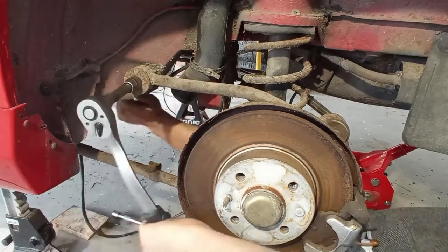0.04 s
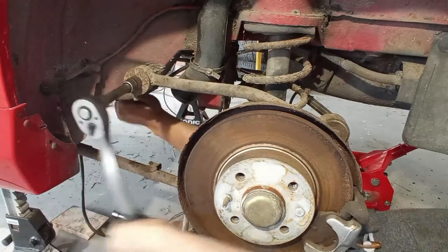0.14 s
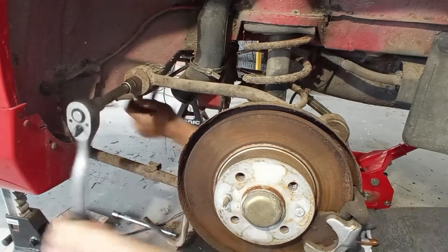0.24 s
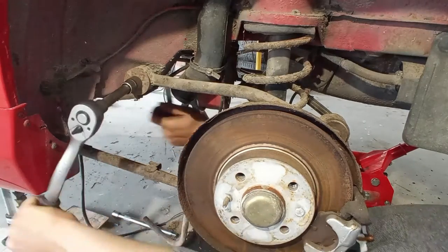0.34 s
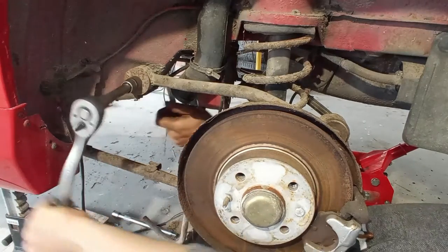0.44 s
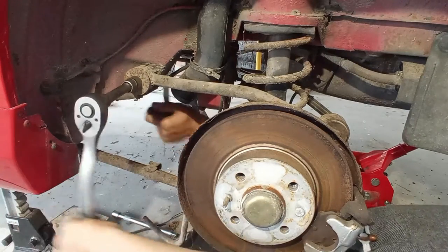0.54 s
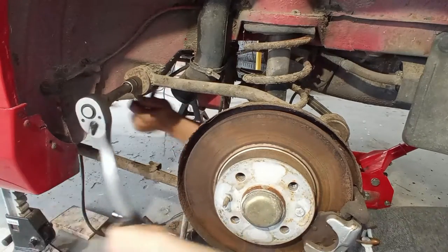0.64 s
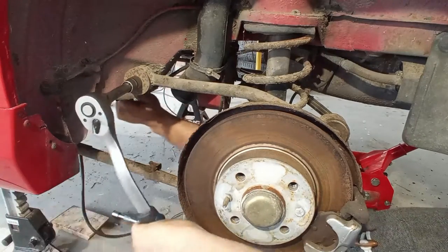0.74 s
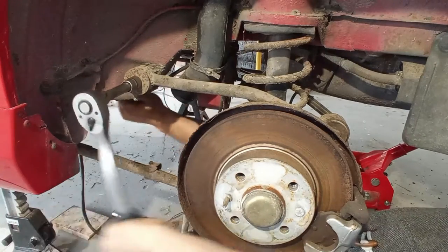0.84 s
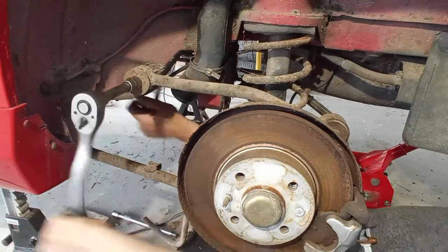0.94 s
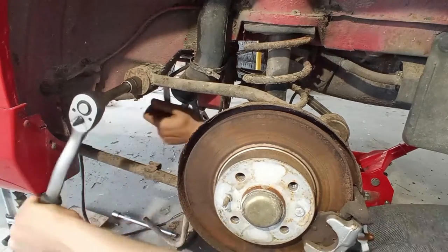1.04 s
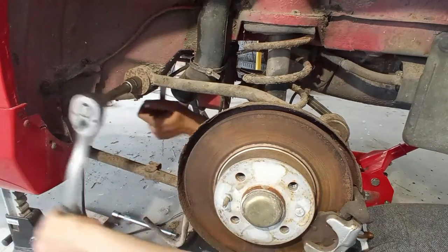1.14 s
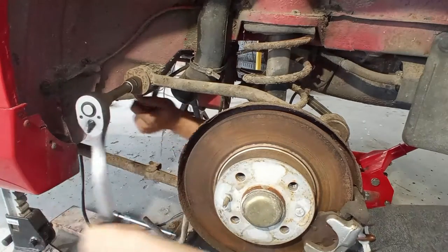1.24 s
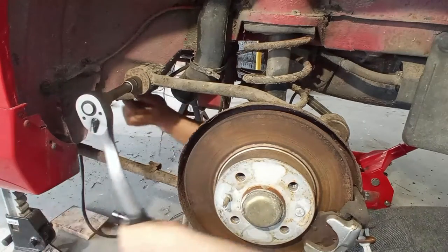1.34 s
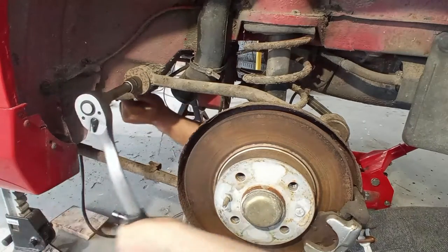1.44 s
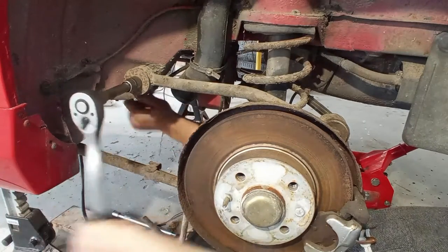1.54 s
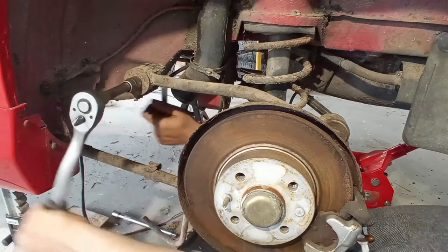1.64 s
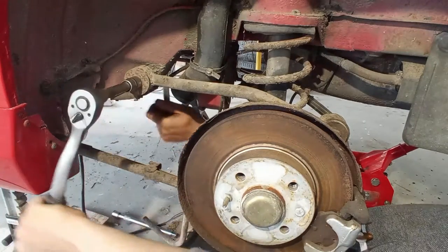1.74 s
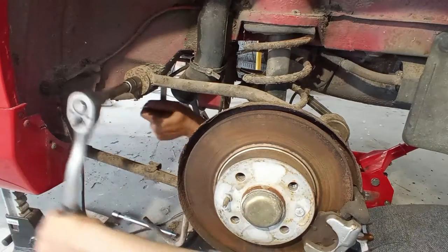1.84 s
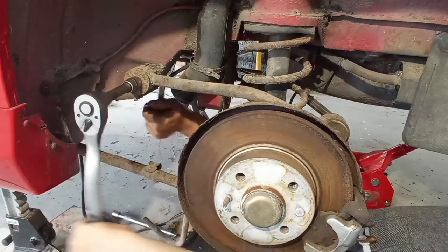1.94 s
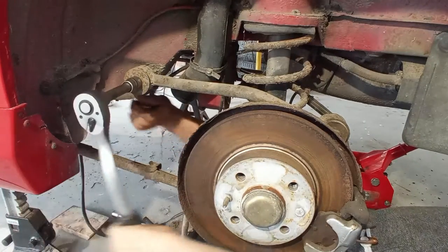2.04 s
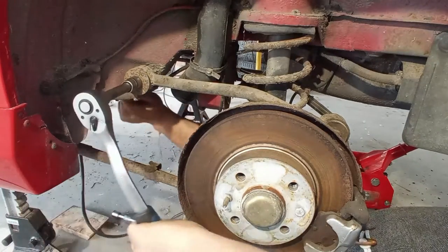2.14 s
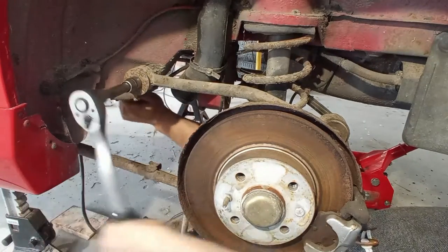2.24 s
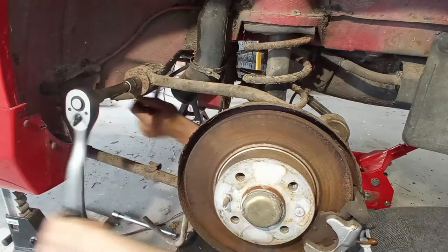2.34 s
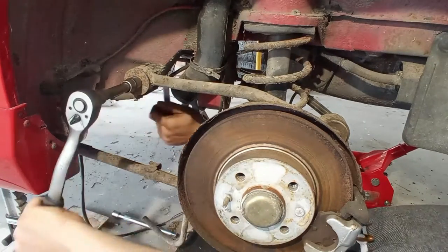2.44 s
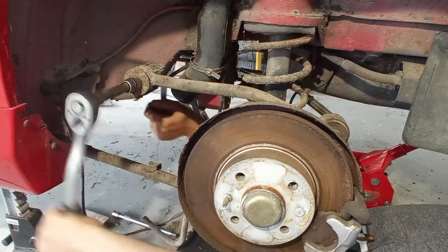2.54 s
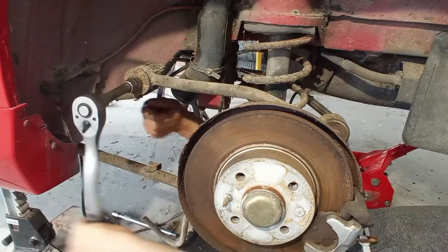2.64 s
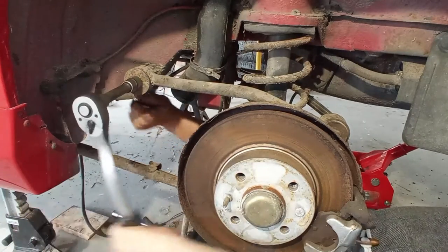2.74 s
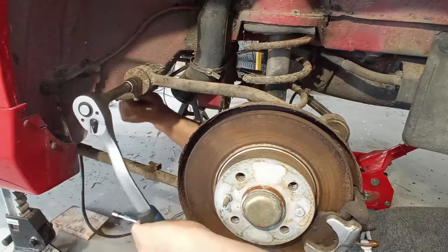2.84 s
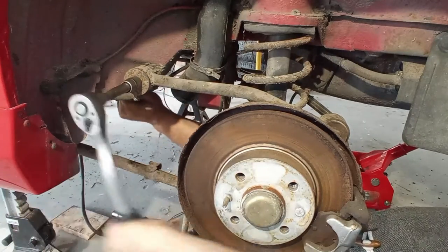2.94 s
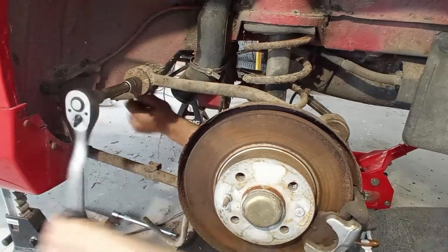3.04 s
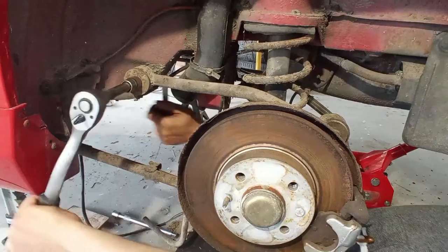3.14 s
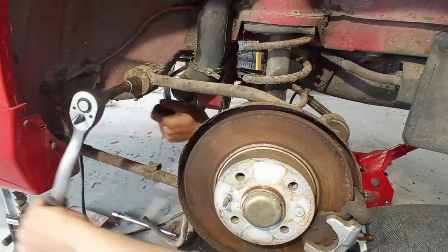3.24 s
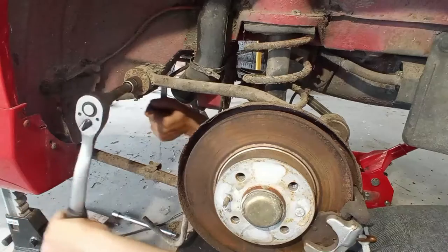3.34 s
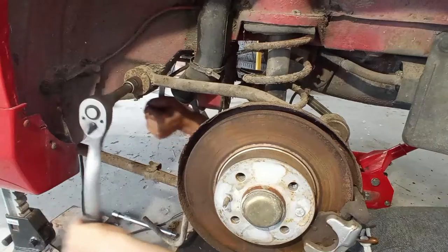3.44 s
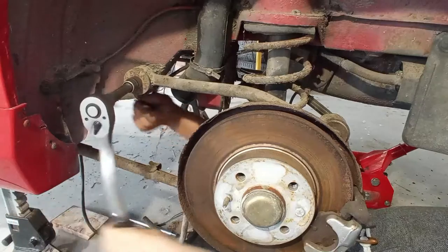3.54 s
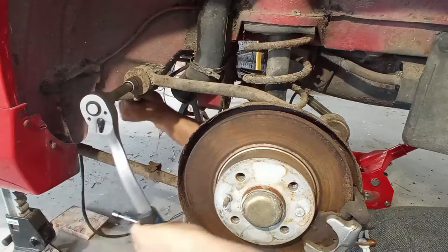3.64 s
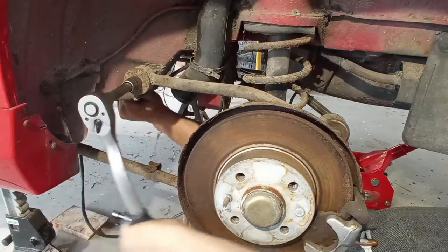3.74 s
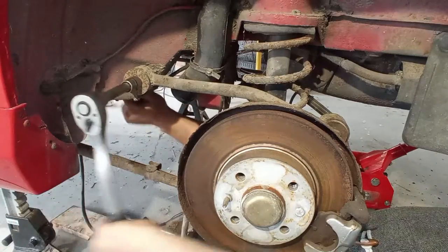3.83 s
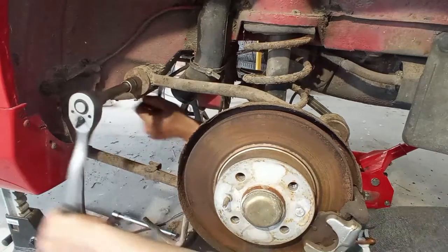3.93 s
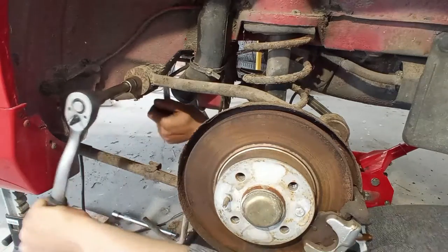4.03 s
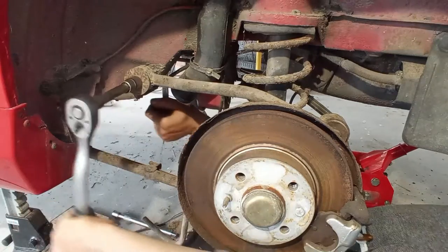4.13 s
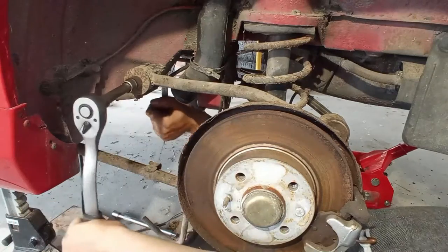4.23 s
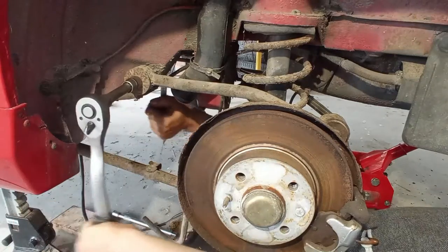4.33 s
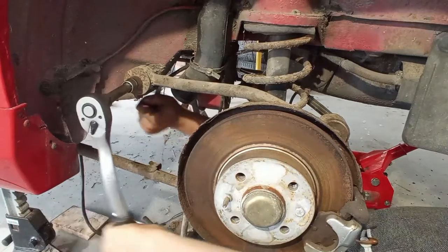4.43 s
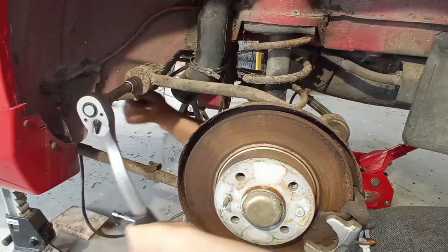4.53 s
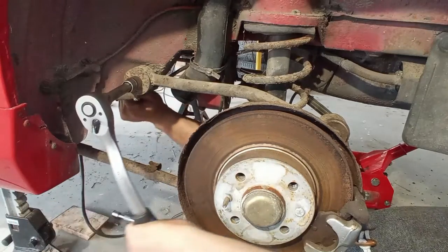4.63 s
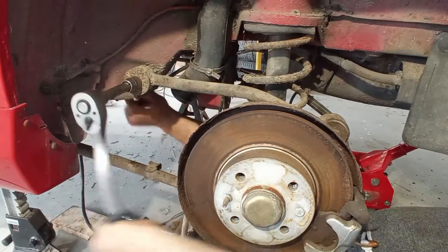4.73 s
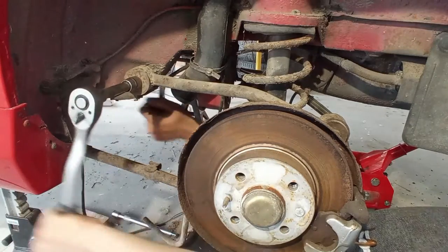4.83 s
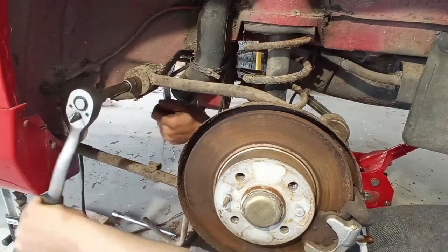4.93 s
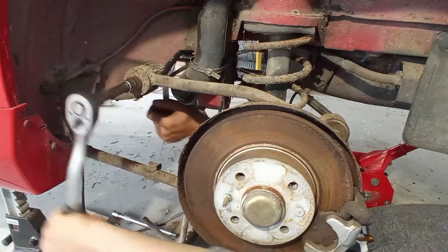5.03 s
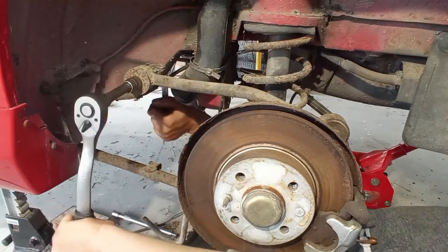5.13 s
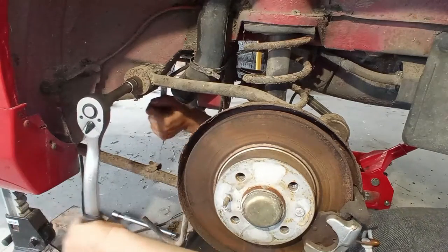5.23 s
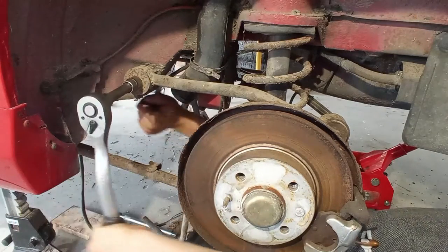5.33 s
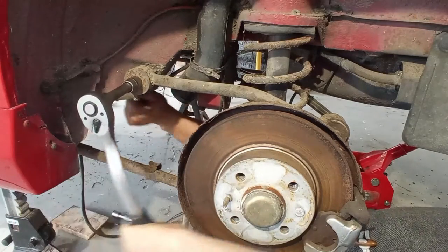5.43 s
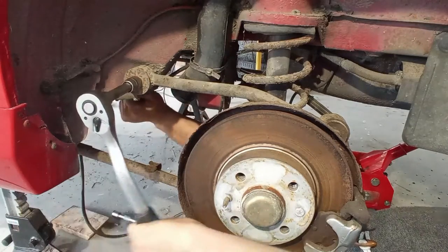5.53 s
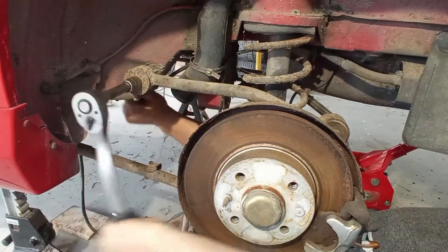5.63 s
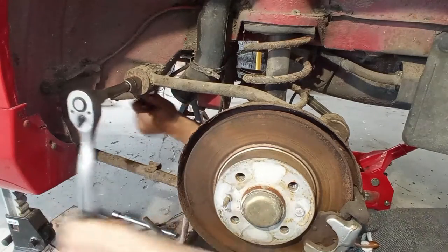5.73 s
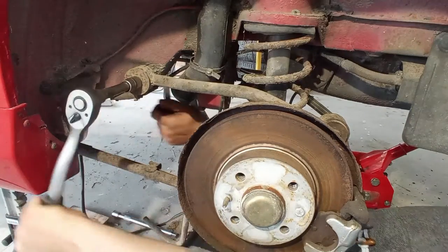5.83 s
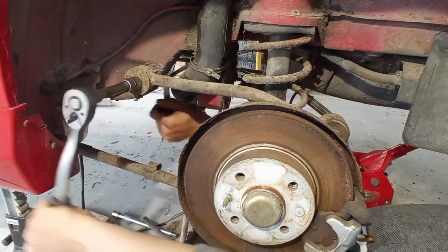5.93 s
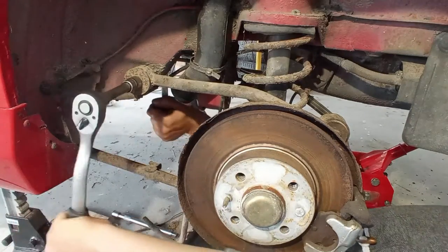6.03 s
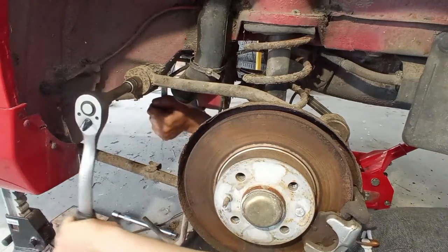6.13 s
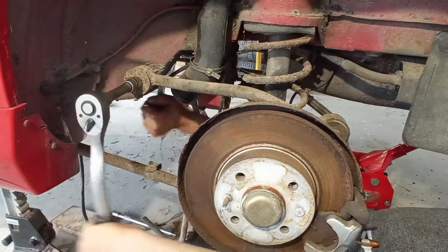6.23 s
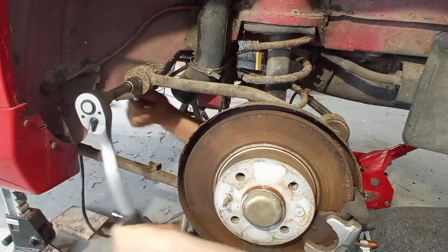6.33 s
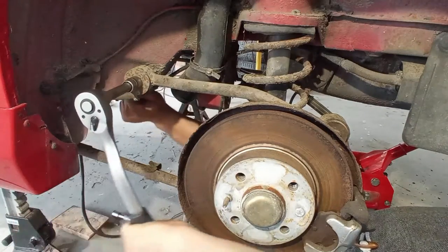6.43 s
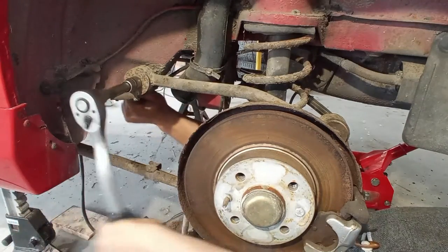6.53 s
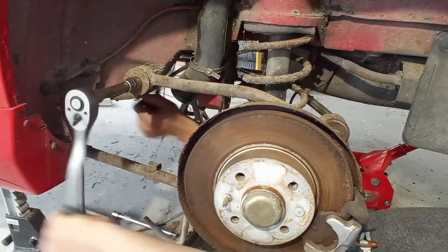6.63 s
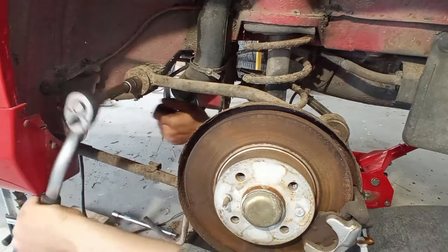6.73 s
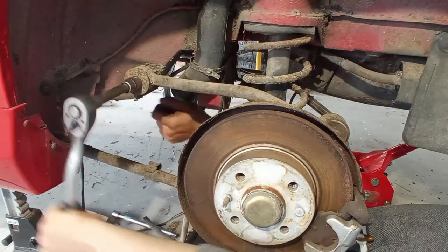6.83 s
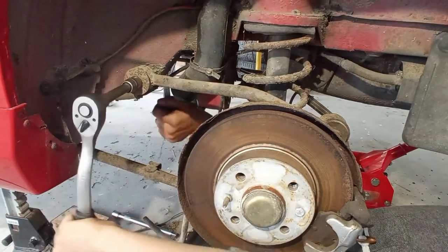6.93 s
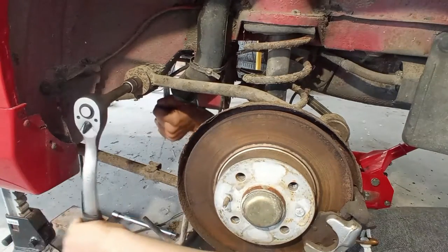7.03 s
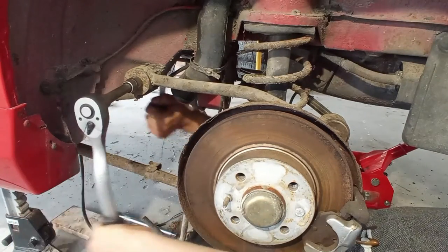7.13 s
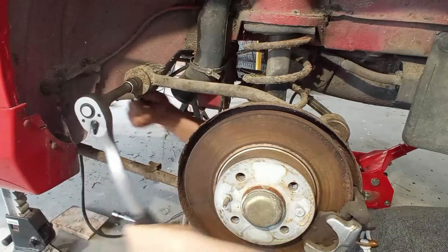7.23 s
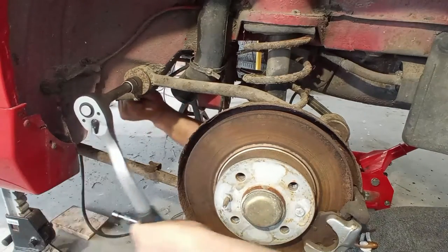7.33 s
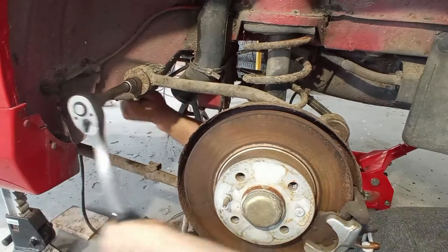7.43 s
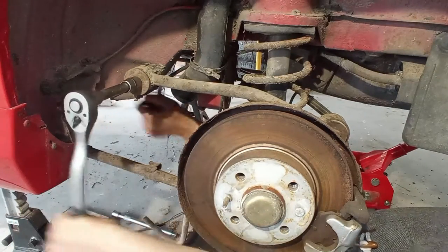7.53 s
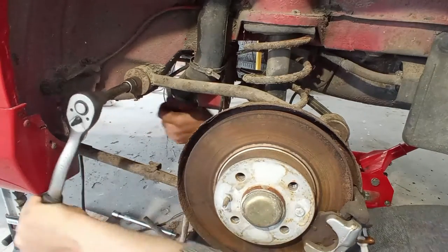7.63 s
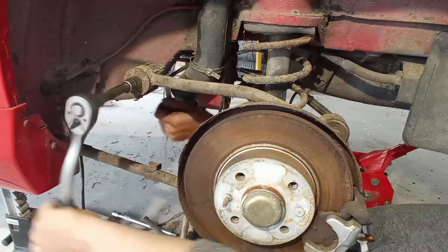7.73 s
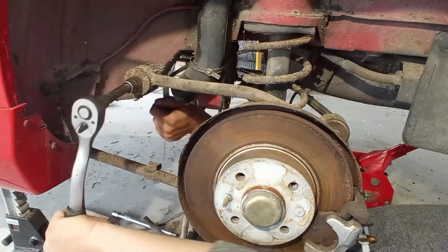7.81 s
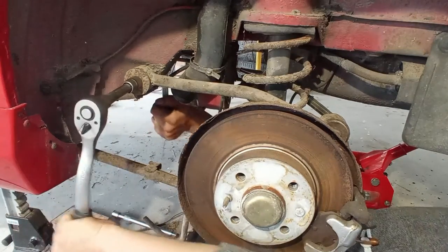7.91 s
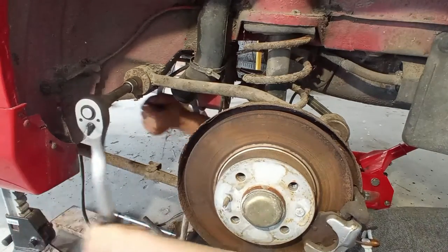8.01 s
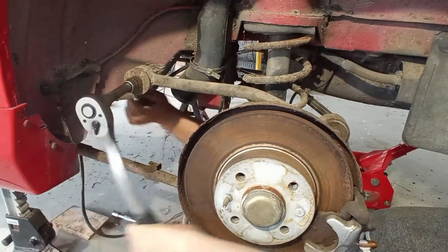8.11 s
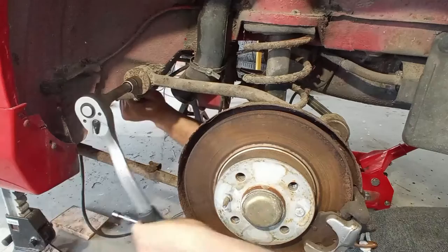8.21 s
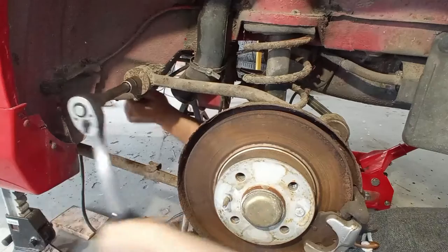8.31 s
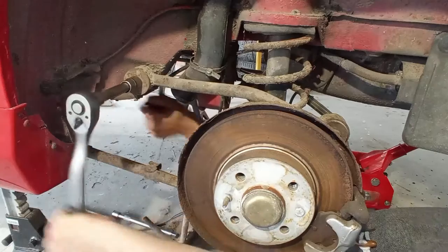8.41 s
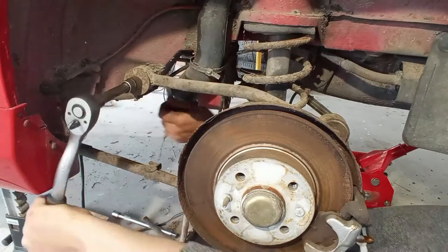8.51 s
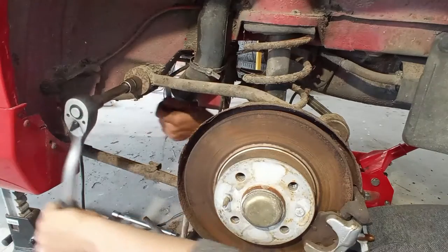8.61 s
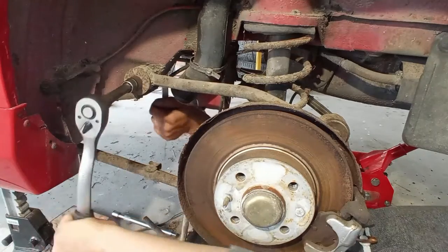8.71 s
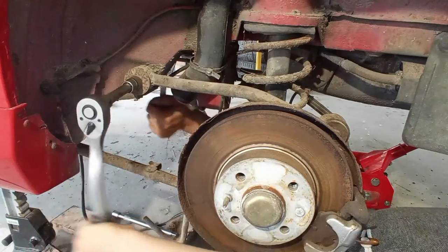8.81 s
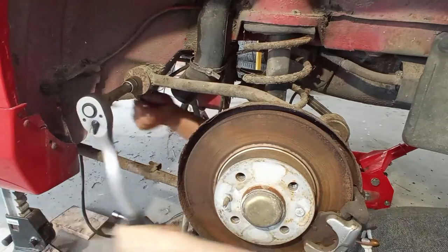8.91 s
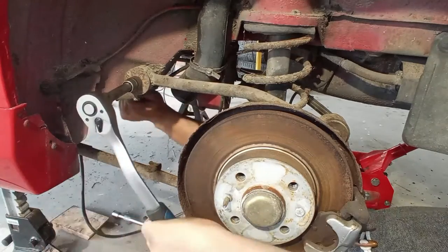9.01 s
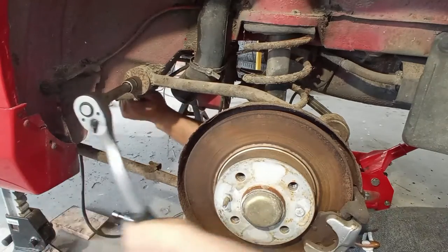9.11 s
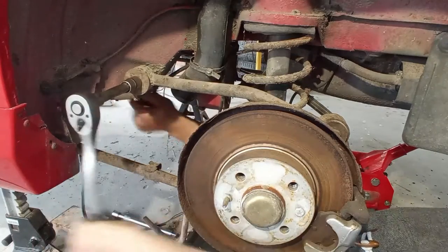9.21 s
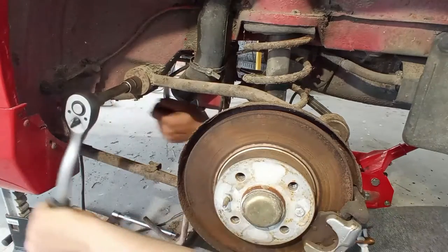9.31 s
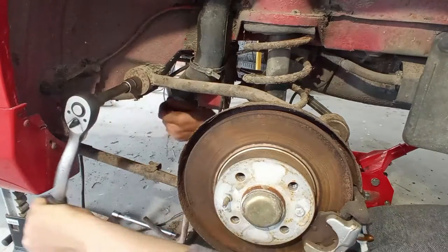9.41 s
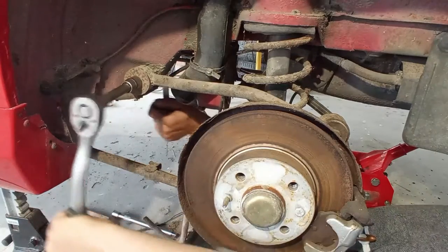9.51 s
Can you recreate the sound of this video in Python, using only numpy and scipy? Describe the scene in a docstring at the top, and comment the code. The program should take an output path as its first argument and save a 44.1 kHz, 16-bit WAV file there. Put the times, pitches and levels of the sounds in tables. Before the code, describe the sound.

Close to the microphone, a steel hand ratchet swings back and forth on a suspension bolt. Roughly every 0.8 seconds a fast run of about fifteen crisp, ringing clicks bursts out, then the socket rattles and the chassis knocks dully as the pull begins. Panels shudder, some pulls grind on rusty thread. Behind it, soft outdoor air, cooing doves, a far rooster and tiny chirps.

```python
"""Outdoor air hisses throughout; doves coo early, a far rooster crows and small birds chirp later.
Under a car a hand ratchet swings on a suspension bolt: twelve returns, each with some fifteen pawl clicks
(ringing steel modes plus noise bursts). About both ends of a swing the loose socket rattles and the chassis
takes dull knocks; its panels shake, the body rocks on a low tone, and some pulls grind the rusty thread."""
import sys
import numpy as np
from scipy import signal
from scipy.io import wavfile
from scipy.ndimage import uniform_filter1d

SR = 44100
rng = np.random.default_rng(int(sys.argv[2]) if len(sys.argv) > 2 else 0)


def amp(db):
    return 10 ** (np.asarray(db, float) / 20)


def write(x):
    x = np.atleast_2d(x).T
    wavfile.write(sys.argv[1], SR, np.round(np.clip(x, -1, 1) * 32767).astype(np.int16))


N = 421596

# modes of the steel head and handle: f/Hz, relative level/dB, t60/s
STEEL_MODES = [(2776, -8, 0.033), (3200, -11, 0.041), (3346.6, 5.5, 0.019), (3670, -5, 0.043),
               (4436, -11.5, .06), (4487, -8.5, .06), (5000, -10.5, 0.017), (5380, -2, 0.028),
               (5713, 0, .045), (6544, -6.5, .03), (7330, -17.5, .04), (9040, -4.5, 0.023),
               (9620, 1, 0.018), (10290, -6.5, .03), (13200, -11, .02), (14900, -4, .025)]


def evened(x):
    """Scales to rms 1."""
    return x / np.sqrt(np.mean(x ** 2) + 1e-20)


def read(points, hz):
    """Interpolates a table linearly over log frequency."""
    f, value = np.transpose(points)
    return np.interp(np.log(hz + 1), np.log(f + 1), value)


def curve(rows):
    """Level curve (t/s, level/dB) as gain, -120 dB outside its span."""
    s, db = np.transpose(rows)
    return amp(np.interp(np.arange(N) / SR, s, db, left=-120, right=-120))


def add(mix, s, sound):
    """Mixes a sound in at time s."""
    part = mix[round(s * SR):][:len(sound)]
    part += sound[:len(part)]


def placed(events, sounds):
    """Mixes each sound in at its event's time."""
    out = np.zeros(N)
    for row, sound in zip(events, sounds):
        add(out, row[0], sound)
    return out


def noise(spectrum, patchy_db):
    """Random short-time spectra with patches drifting over time and frequency, rms 1."""
    real, imag, patches = rng.standard_normal((N // 128 + 5, 257, 3)).T
    patches = uniform_filter1d(patches, size=3, axis=0)
    patches = evened(uniform_filter1d(patches, size=20, axis=1))
    level_db = read(spectrum, np.fft.rfftfreq(512, 1 / SR))[:, None] + patchy_db * patches
    z = (real + 1j * imag) * amp(level_db)
    return evened(signal.istft(z, nperseg=512, noverlap=384)[1][:N])


def whistle(size, hz, width_hz):
    """Noise through one narrow, steep-sided resonance (two equal poles), rms 1."""
    pole = [1, -np.exp(-np.pi * width_hz / SR)]
    blur = rng.standard_normal((size, 2)) @ [1, 1j]
    for _ in range(2):
        blur = signal.lfilter([1], pole, blur)
    return evened((blur * np.exp(2j * np.pi * hz * np.arange(size) / SR)).real)


def blows(events, modes, spread_db, rise_s, tilt_db_per_octave=0):
    """Each blow rings the same modes, each with its own share and phase; the grip shifts them a little."""
    hz, db, t60_s = np.transpose(modes)
    t = np.arange(4096) / SR
    share, phase, grip = np.moveaxis(rng.standard_normal((len(events), len(modes), 3, 1)), 2, 0)
    tilt_db = np.outer(tilt_db_per_octave, np.log2(hz / 300))
    level_db = (db + tilt_db)[..., None] + spread_db * share
    shifted_hz = hz[:, None] * (1 + .012 * grip)
    rings = np.sin(2 * np.pi * shifted_hz * t + 2 * phase) * amp(-60 * t / t60_s[:, None])
    sounds = (amp(level_db) * rings).sum(1) * (1 - np.exp(-t / rise_s))
    onset_rms = np.sqrt(np.mean(sounds[:, :300] ** 2, 1, keepdims=True))
    return amp(np.transpose(events)[1])[:, None] * sounds / onset_rms


def crackle(events, spectrum, low_t60_s, high_t60_s, tick_db):
    """Modes too dense to count: a noise burst a blow, with a sharp tick, the treble dying sooner."""
    train, t = np.zeros(N), np.arange(3000) / SR
    for s, db in events:
        add(train, s, amp(np.array([2 * db])))  # power
    hiss = noise(spectrum, 2.5)
    hiss = hiss / np.sqrt(uniform_filter1d(hiss ** 2, size=100))  # even strength from blow to blow
    low = signal.sosfilt(signal.butter(2, 7500, fs=SR, output="sos"), hiss)
    high = hiss - low
    rise = (1 - np.exp(-t / 0.00047)) ** 2
    tick = amp(2 * tick_db - 120 * t / .01)
    low_power = amp(-120 * t / low_t60_s) + .6 * tick
    high_power = amp(-120 * t / high_t60_s) + tick
    low_gain, high_gain = [np.sqrt(abs(signal.oaconvolve(train, rise * power)[:N]))
                           for power in (low_power, high_power)]
    return low * low_gain + high * high_gain


def teeth():
    """Evenly spaced teeth under a pendulum swing: clicks crowd and grow where the handle is fastest."""
    # return strokes: first tooth t/s, last tooth t/s, teeth, swing phase/rad at first, at last
    strokes = [(.2669, .464, 19, -.836, 1.355), (.9681, 1.123, 15, -.598, 1.094),
               (1.6451, 1.7694, 13, -.674, 1.113), (2.3629, 2.5179, 14, -.57, 1.282),
               (3.0868, 3.2465, 15, -.796, 1.262), (3.9351, 4.0734, 13, -.557, 1.179),
               (4.8426, 5.0063, 14, -.066, 1.36), (5.772, 5.9086, 14, -.433, 1.103),
               (6.6626, 6.8287, 14, -.654, 1.492), (7.5631, 7.7274, 16, -.492, 1.22),
               (8.4279, 8.5945, 15, -.301, 1.232), (9.2819, 9.4589, 16, -.74, 1.396)]
    # one sharp slack click before a stroke: t/s, relative level/dB
    lone_click = (5.731, -11)
    rest_db, speed_db, spread_db = -12.5, 1.3, 1.0  # relative: at rest, gained at full speed, tooth to tooth
    click_delay_s = .0005  # every stroke click sounds this much after its listed time
    rows = [lone_click]
    for first, last, count, begin, end in strokes:
        phase = np.arcsin(np.linspace(np.sin(begin), np.sin(end), count))
        db = rest_db + speed_db * np.cos(phase) + spread_db * rng.standard_normal(count)
        s = click_delay_s + first + (last - first) * (phase - begin) / (end - begin)
        rows += zip(s, db)
    return rows


def pawl():
    """Each click rings the steel and snaps with a noise burst."""
    # snap spectrum: f/Hz, relative density/dB
    snap = [(410, -36.5), (700, -19), (2040, -8), (2420, -9), (3290, -6.5), (4020, 0.5), (5610, -1),
            (7940, -8), (9570, 1), (11800, -12), (15300, -5.5), (16300, -36.5), (17000, -65)]
    clicks = teeth()
    ring = placed(clicks, blows(clicks, STEEL_MODES, spread_db=5.2, rise_s=0.00069))
    burst = crackle(clicks, snap, low_t60_s=0.046, high_t60_s=0.037, tick_db=4.8)
    return amp(-9.5) * ring + amp(-4.6) * burst


def socket_rattle():
    """Socket and extension take up their slack, ringing the same steel with a duller burst."""
    # slack blows: t/s, relative level/dB
    slack = [(0.183, -50), (0.2246, -43.5), (0.2377, -27.5), (0.246, -39.5), (0.5191, -27), (0.5375, -33.5),
             (0.5436, -31.5), (0.8904, -31.5), (0.9195, -29.5), (0.9382, -25), (1.2172, -31), (1.2243, -34),
             (1.6044, -34.5), (1.6107, -25), (1.6308, -39.5), (1.885, -35.5), (2.2944, -42.5),
             (2.3127, -32.5), (2.3306, -34), (2.3462, -33.5), (2.6139, -35.5), (3.014, -43), (3.0484, -28),
             (3.0731, -31), (3.2987, -36), (3.8781, -36), (3.9036, -36.5), (4.7948, -27.5), (4.833, -39),
             (5.0915, -37.5), (5.7269, -28.5), (6.0129, -36), (6.585, -39.5), (6.5979, -36), (6.6113, -31),
             (6.8729, -30.5), (6.902, -33.5), (6.9068, -23), (7.488, -50), (7.5075, -36.5), (7.5141, -27.5),
             (7.5493, -37.5), (7.8132, -28), (7.8328, -32.5), (8.3802, -32.5), (8.415, -38), (8.6954, -34),
             (8.72, -36), (9.2347, -29.5), (9.2424, -20.5), ]
    # rattle spectrum: f/Hz, relative density/dB
    rattle = [(410, -32.5), (700, 1.5), (1420, -9), (1620, 0), (3200, -8.5), (6410, -8), (15100, -36.5),
              (17000, -44)]
    ring = placed(slack, blows(slack, STEEL_MODES, spread_db=6., rise_s=0.00044))
    burst = crackle(slack, rattle, low_t60_s=0.052, high_t60_s=.03, tick_db=2.4)
    return amp(-13.5) * ring + amp(1.0) * burst


def wheel_well(x):
    """Reverberation: sparse taps of random sign, each band dying at its own speed."""
    # decay: f/Hz, t60/s
    decay = [(500, .25), (2000, .3), (5000, 0.31), (12000, .2)]
    taps = np.zeros(SR // 2)
    at = np.arange(150, SR // 2 - 20, 20)
    taps[at + rng.integers(0, 20, len(at))] = rng.choice([-1., 1.], len(at))
    hz, t, z = signal.stft(taps, SR, nperseg=256)
    tail = signal.istft(z * amp(-60 * t / read(decay, hz)[:, None]), SR, nperseg=256)[1]
    return signal.oaconvolve(x, tail / np.linalg.norm(tail))[:N]


def knocks():
    """Each knock is a first contact and a scatter of rebounds while the parts settle."""
    # knocks into the chassis: t/s, relative level/dB, brightness/(1.8 dB per octave of tilt about 300 Hz),
    # settling t60/s
    hits = [(0.239, -24.5, -4.5, 0.15), (0.435, -2, 0, 0.27), (0.545, -16, -1.5, 0.18),
            (0.938, -25, -6.5, 0.16), (1.213, -20.5, -0.5, 0.47), (1.612, -27.5, -17.5, 0.2),
            (1.891, -24, 0.5, 0.28), (2.332, -21.5, -4, 0.38), (2.615, -21, 3, 0.26),
            (3.017, -29.5, -11, 0.26), (3.046, -22, -5.5, 0.2), (3.22, -27, 0, 0.15), (3.355, -27, 3, 0.26),
            (3.88, -21, -6.5, 0.43), (4.18, -30, -3, 0.3), (4.804, -26, -3, 0.36), (5.027, -22, 6.5, 0.24),
            (5.114, -25.5, -10, 0.6), (5.733, -20, 2.5, 0.42), (5.929, -28, 5, 0.52),
            (6.032, -24, -10, 0.3), (6.102, -32, -41, 0.39), (6.613, -17, -4.5, 0.38),
            (6.797, -15, -15, 0.44), (6.906, -20.5, -1.5, 0.39), (7.511, -22.5, -9.5, 0.14),
            (7.551, -27, -5, 0.17), (7.73, -22.5, -7, 0.29), (7.823, -17.5, 0, 0.48),
            (8.378, -20, 3.5, 0.27), (8.53, -26, 4, 0.2), (8.704, -21, -1.5, 0.34), (9.238, -25, -2, 0.31)]
    # modes of body panels and suspension arms: f/Hz, relative level/dB, t60/s
    modes = [(135, -15, 0.096), (221.4, -3, .08), (303, -4.5, 0.057), (478, -0.5, 0.026), (641, 1, 0.048),
             (780, -15, .05), (1000, -9.5, .04), (1450, -19, .04)]
    _, _, bright_db, settle_s = np.transpose(hits)
    t = np.arange(8000) / SR
    where, size = np.moveaxis(rng.random((len(hits), len(t), 2)), 2, 0)
    chosen = where < 500 / SR  # about 500 rebounds a second
    rebounds = .45 * chosen * (2 * size - 1) * amp(-60 * t / np.clip(settle_s, .02, 1)[:, None])
    rebounds[:, 0] = 1  # first contact
    rings = blows(hits, modes, spread_db=0.5, rise_s=0.00095, tilt_db_per_octave=1.8 * bright_db)
    return amp(-7) * placed(hits, signal.fftconvolve(rings, rebounds, axes=1))


def shaken_panels():
    """Each push sets the panels going, sagging until the pull, which jolts them anew and dies away."""
    # swings: push t/s, push level/dB, pull t/s, pull level/dB, decay after the pull/(dB/s)
    swings = [(-.2, -46, -.03, -44, 110), (.23, -33, .43, -22, 95), (.9, -38, 1.21, -29, 150),
              (1.6, -33, 1.88, -37, 115), (2.3, -33, 2.61, -34, 106), (3.01, -35, 3.35, -35, 80),
              (3.87, -34, 4.05, -33, 80), (4.8, -34.5, 5.1, -35, 62), (5.72, -33, 6.02, -38, 75),
              (6.6, -33, 6.9, -30, 115), (7.5, -33, 7.81, -31, 80), (8.37, -33, 8.7, -29, 170),
              (9.23, -35, 9.6, -40, 100)]
    # panel spectrum: f/Hz, relative density/dB
    panels = [(53, -35), (90, -10.5), (122, 0), (157, -3.5), (540, -4), (779, -8), (1720, -16.5),
              (2890, -29.5), (5560, -30.5), (7860, -51.5), (9000, -37.5), (11700, -64), (19800, -120)]
    rise_s, sag_db_per_s, still_db = .03, 22, -68
    lean_db, lean_db_per_s = -17, 180  # the hand leans in before each push
    t, power = np.arange(N) / SR, amp(2 * still_db)
    for push, push_db, pull, pull_db, dying_db_per_s in swings:
        after_db = dying_db_per_s * np.maximum(t - pull, 0)
        lean = amp(lean_db - lean_db_per_s * np.maximum(push - t, 0))
        start = np.clip((t - push) / rise_s, lean, 1)
        sag_db = sag_db_per_s * np.maximum(t - push, 0)
        power = power + start ** 2 * amp(2 * (push_db - sag_db - after_db))
        jolt = np.clip((t - pull) / rise_s, 0, 1)
        power = power + jolt ** 2 * amp(2 * (pull_db - after_db))
    return np.sqrt(power) * noise(panels, patchy_db=4.)


def rocking():
    """The body rocks on its jack: a low wavering tone swells to each rock and sinks again."""
    # rocks after pushes and pulls: t/s, level/dB
    rocks = [(0, -39), (.57, -45), (.69, -48), (.97, -46), (1.16, -51), (1.31, -43), (1.5, -53),
             (1.64, -48), (1.96, -46), (2.37, -55), (2.72, -42), (3.06, -52), (3.45, -44), (3.63, -52),
             (3.95, -48), (4.12, -52), (4.33, -53), (5.23, -45), (5.43, -53), (5.78, -47), (6.11, -42),
             (6.36, -53), (6.5, -50), (6.65, -47), (6.87, -40), (7.05, -45), (7.35, -49), (7.54, -50),
             (7.79, -40), (7.95, -50), (8.45, -49), (8.78, -53), (9.29, -46), (9.5, -53)]
    rise_db_per_s, fall_db_per_s = 170, 120
    t = np.arange(N) / SR
    swell = sum(amp(db + np.minimum(rise_db_per_s * (t - s), fall_db_per_s * (s - t))) for s, db in rocks)
    hz = 54 + 12.0 * evened(uniform_filter1d(rng.standard_normal(N), size=4000))
    return swell * np.sqrt(2) * np.sin(2 * np.pi * np.cumsum(hz) / SR)


def grinding():
    """The rusty thread grinds under the pull: noise through the resonances of bolt and link."""
    # pulls: t/s, length/s, level/dB, change over the length/dB
    grind = [(1.24, .31, -57.5, -6.5), (4.05, .25, -46, -14), (5.1, .58, -40, -24), (7.86, .5, -41, -21)]
    # resonances of bolt and link: f/Hz, pole width/Hz, relative level/dB
    link = [(620, 66, -7.5), (758, 130, 4), (987, 60, -3), (1327, 55, -3.5), (1540, 39, -8.5),
            (1950, 28, -15.5), (2170, 90, -12.5), (3900, 250, -16), (5600, 970, -12)]
    ring = evened(sum(amp(db) * whistle(N, hz, width_hz) for hz, width_hz, db in link))
    pull = sum(curve([(s, db), (s + length, db + change_db)]) for s, length, db, change_db in grind)
    return uniform_filter1d(pull, size=900) * ring


def chassis():
    """Knocks, shaken panels, the rocking body and the grinding thread."""
    return knocks() + shaken_panels() + rocking() + grinding()


def call(rows):
    """Near-sine voice, with a third partial where one is listed; distance makes it waver."""
    s, hz, *levels_db = np.transpose(rows)
    t = np.arange(s[0], s[-1], 1 / SR)
    turn = 2 * np.pi * np.cumsum(np.interp(t, s, hz)) / SR
    waver = 1 + 0.32 * evened(uniform_filter1d(rng.standard_normal(len(t)), size=600))
    tone = sum(amp(np.interp(t, s, db)) * np.sin((2 * k + 1) * turn) for k, db in enumerate(levels_db))
    return s[0], np.sqrt(2) * tone * waver * signal.windows.tukey(len(t), .15)


def birds():
    """Doves and a rooster as gliding tones; chirps and a twitter as narrow noise, blurred by distance."""
    # one table a coo: t/s, f/Hz, level/dB
    doves = [
        [(0, 528, -56.5), (.2, 505, -44.5), (.25, 505, -46)],
        [(.68, 504, -46), (.81, 523.5, -55), (.95, 511, -47)],
        [(1.3, 500.3, -57), (1.38, 506, -50.5), (1.49, 480, -66)],
        [(2.68, 499.4, -49), (2.72, 517, -41.5), (2.83, 504.4, -43), (2.9, 496, -53), (3.04, 484, -46)],
        [(3.36, 499.5, -46), (3.56, 491, -54)],
    ]
    # one table a crow: t/s, f/Hz, level/dB, third partial level/dB
    rooster = [
        [(3.5, 588.0, -64, -95), (3.53, 583.1, -49.5, -77), (3.83, 605.4, -67, -94)],
        [(6.2, 512.7, -84, -58), (6.298, 612.7, -50, -59), (6.56, 601.5, -67, -80)],
        [(7.03, 620, -58, -59), (7.12, 620, -60, -69), (7.2, 603, -91, -72)],
    ]
    # small birds: t/s, length/s, f/Hz, pole width/Hz, level before fading/dB
    chirps = [(4.356, 0.14, 4150, 120, -69), (4.365, .09, 3650, 149, -63), (4.384, 0.11, 2884, 60, -71),
              (4.46, .08, 3830, 151, -63), (4.55, .06, 3660, 120, -65), (4.56, .06, 3040, 200, -69.5),
              (4.64, .11, 3950, 200, -65.5), (4.646, 0.062, 3300, 250, -68), (6.1, 0.24, 4194, 1205, -59.5),
              (6.363, 0.19, 3440, 200, -71), (8.17, .07, 6700, 101.5, -73.5), (8.27, .11, 5750, 79.5, -65),
              (8.9, .14, 6900, 79.4, -74), (9.0, .2, 5000, 80, -67.5)]
    out = np.zeros(N)
    for rows in doves + rooster:
        add(out, *call(rows))
    for s, length, hz, width_hz, db in chirps:
        t = np.arange(0, length, 1 / SR)
        fade = np.minimum(t / 0.00796, 1) * (1 - t / length) ** .7
        add(out, s, amp(db) * whistle(SR // 2, hz, width_hz)[:len(t)] * fade)
    return out


def air():
    """Outdoor hiss with hollow tones (narrow noise), each swelling and fading."""
    # hiss spectrum: f/Hz, relative density/dB
    hiss = [(53, -28), (90, 3.5), (163, -11.5), (1100, -23.5), (1560, -17), (1900, -15.5), (8240, -35),
            (15200, -44.5), (17000, -54.5)]
    # hiss swell: t/s, level/dB
    hiss_swell = [(0, -65.5), (2.2, -67), (2.9, -62.5), (4.6, -62), (5.6, -63.5), (6.5, -64.5), (7.3, -67),
                  (9.6, -68)]
    # hollow tones: f/Hz, pole width/Hz, level before the swell/dB
    drone = [(355.7, 60, -70), (1065, 150, -68.5)]
    # hollow tone swell: t/s, gain/dB
    drone_swell = [(0, 0.5), (4.5, 2.5), (6.1, 6.5), (7.4, -4), (8.8, -8), (9.6, -10)]
    tones = sum(amp(db) * whistle(N, hz, width_hz) for hz, width_hz, db in drone)
    return curve(hiss_swell) * noise(hiss, patchy_db=2.) + curve(drone_swell) * tones


def scene():
    """All sources at one microphone; the tool also echoes in the wheel well."""
    tool = pawl() + socket_rattle()
    return (tool + amp(-12) * wheel_well(tool) + chassis() + birds() + air())[None]


def low_pass(x):
    """Removes everything above the highest recorded frequency."""
    return signal.sosfilt(signal.butter(12, 17130, fs=SR, output="sos"), x)


def record(dry):
    """The microphone drops the deepest bass."""
    heard = signal.sosfilt(signal.butter(4, 44, "high", fs=SR, output="sos"), dry)
    return low_pass(heard)


dry = scene()
out = record(dry)
write(out)
```